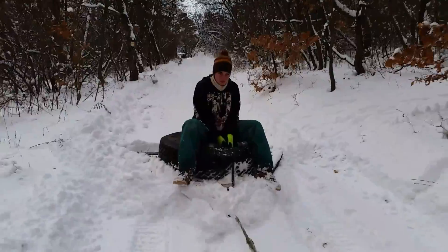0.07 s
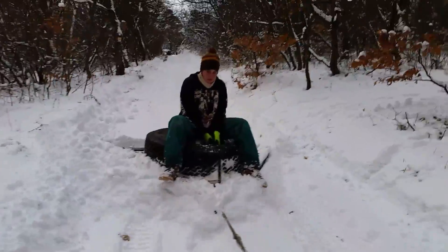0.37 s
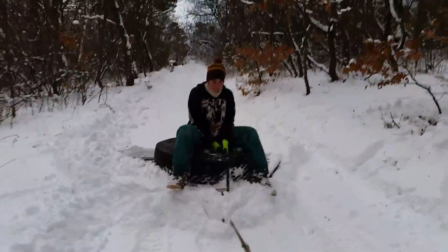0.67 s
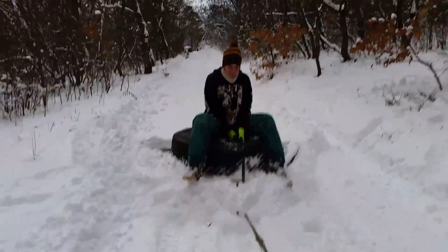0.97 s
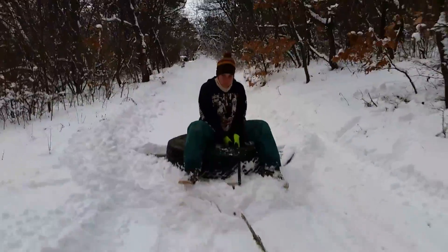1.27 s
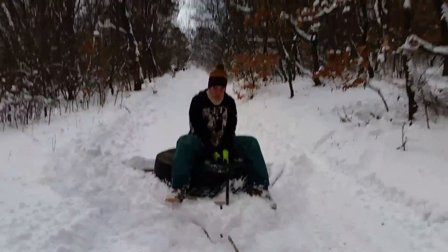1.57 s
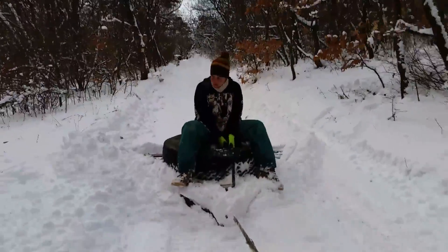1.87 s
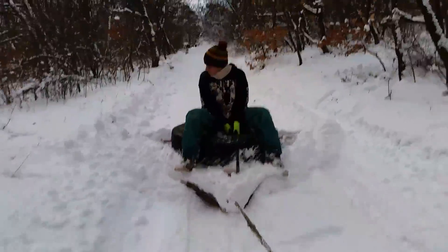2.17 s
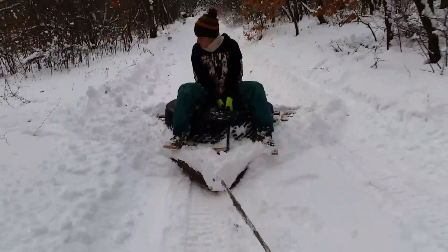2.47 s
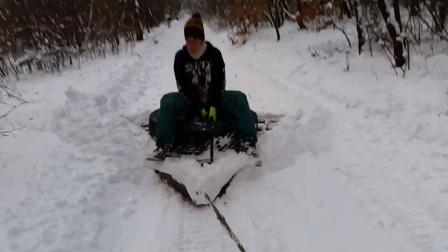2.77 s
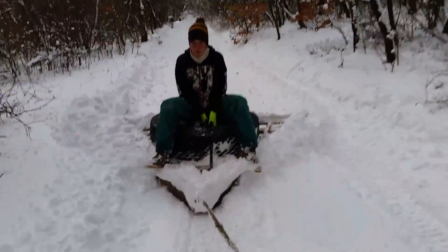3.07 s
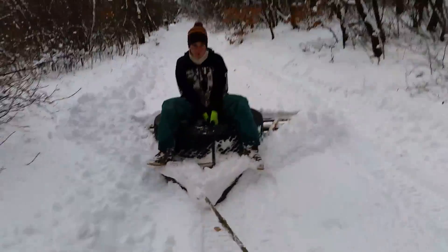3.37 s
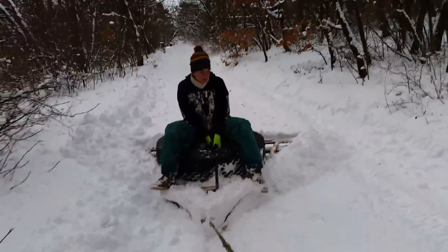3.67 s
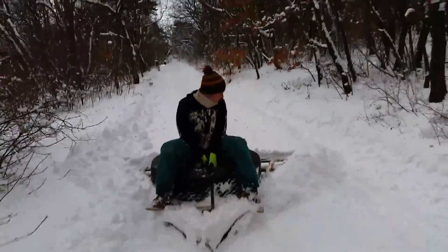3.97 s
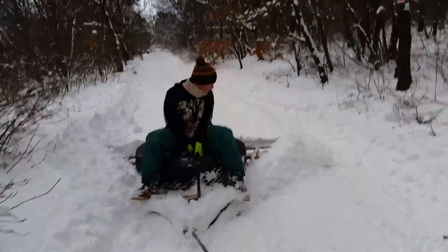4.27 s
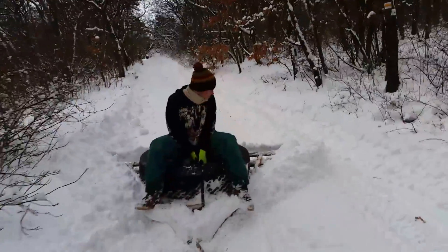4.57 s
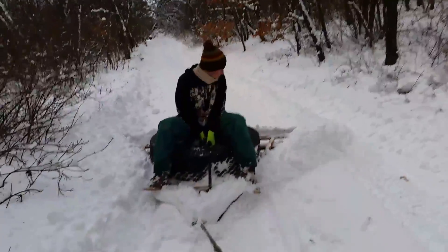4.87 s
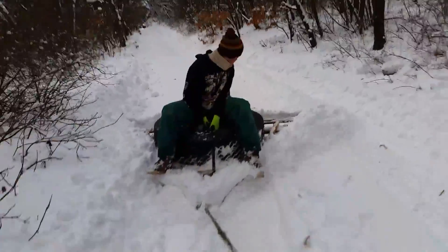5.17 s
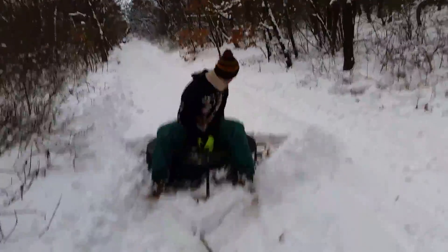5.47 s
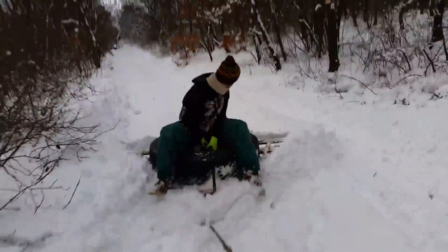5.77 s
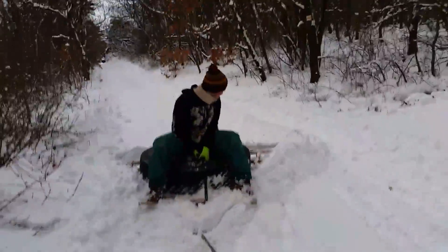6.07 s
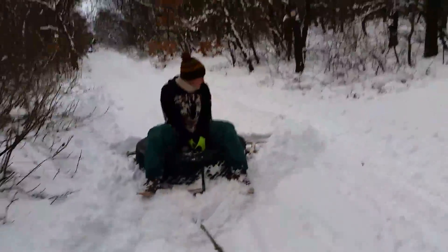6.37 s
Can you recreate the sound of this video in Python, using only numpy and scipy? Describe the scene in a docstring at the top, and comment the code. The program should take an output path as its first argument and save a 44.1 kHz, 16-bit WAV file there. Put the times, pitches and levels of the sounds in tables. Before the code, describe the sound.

A deep, booming four-cylinder exhaust dominates throughout about six and a half seconds, heard from the open back of a vehicle towing a small snow plough along a forest track. Soft engine knocking, valve clatter and low tyre rumble blend with it. The revs hold fairly steady until about 2.8 seconds, then sink in steps, wavering and labouring from 5 seconds on. The exhaust gulps very briefly at about 1.5, 2.8, 5, 5.3, 6 and 6.5 seconds.

More quietly, snow crunches and hisses continuously under the plough, growing a little stronger, with lumps crushed near 1.5 seconds, repeatedly between 3.5 and 5.3, and again towards the end. At about 5.8 seconds the towed frame gives one very short, ringing scrape. Tiny, sharp ticks occur irregularly close to the microphones, two or three a second. The left side carries most of the treble; the right sounds duller.

```python
"""The booming exhaust of a four-cylinder vehicle, heard by two microphones in its open back as it tows a
small snow plough with a rider along a forest track. Now and then the exhaust gulps as the revs sink.
The engine's casing knocks, its valves clatter and the tyres rumble. Snow crunches and hisses under the
plough, the towed frame scrapes once, and something small ticks close by.
The left microphone gets most of the treble."""
import sys
import numpy as np
from scipy import signal
from scipy.fft import rfft, irfft, next_fast_len
from scipy.io import wavfile
from scipy.ndimage import uniform_filter1d, minimum_filter1d

SR = 44100
rng = np.random.default_rng(int(sys.argv[2]) if len(sys.argv) > 2 else 0)


def log_audio(samples):
    """Write samples as a 16-bit WAV file to the path given in sys.argv[1]."""
    # one column per channel
    frames = np.atleast_2d(samples).T
    # limit to full scale, then quantise
    limited = np.clip(frames, -1, 1)
    pcm = np.round(limited * 32767).astype(np.int16)
    wavfile.write(sys.argv[1], SR, pcm)


N = 287973
TIME = np.arange(N) / SR

# spectrum of snow lumps and crusts breaking: (frequency [Hz], relative level [dB])
BREAKING_SNOW = [(500, -19.5), (1000, -12), (1600, -0.5), (2400, -1), (4000, -2), (6200, -23), (10000, -11),
                 (15000, -27.5)]


def exhaust(firings, hz, waver_db=.5, boom_lag_s=.0009):
    """Three strong harmonics of the firing rate, each as loud as the pipe makes it at that pitch."""
    # response of the exhaust pipe: (frequency [Hz], level [dB])
    pipe = [(53, -17), (60, -16.5), (63.5, -11), (69, -13), (110, -12.5), (121, -15), (135, -15.5),
            (165, -16.5), (188, -14), (205, -14.5)]
    # a standing wave in the open back pans the firing tone: (firing rate [Hz], left minus right [dB])
    standing_wave = [(59.5, 6), (63, -2.5), (68, -4)]
    angle = 2 * np.pi * firings
    first = undb(at(pipe, hz) + waver_db * walk(42)) * np.cos(angle)
    # the pipe's resonance holds the second harmonic back by a share of its cycle
    second = undb(at(pipe, 2 * hz) + waver_db * walk(25)) * np.cos(2 * angle - 2 * np.pi * .13)
    third = undb(at(pipe, 3 * hz) + waver_db * walk(25)) * np.cos(3 * angle)
    pan_db = at(standing_wave, hz)
    boom = two_mics(first, boom_lag_s) * undb(np.array([pan_db, -pan_db]) / 2)
    return np.sqrt(2) * (boom + two_mics(second + third, lag_s=.00068))


def gulping(boom, hz, level_db=-5, pitch_ratio=1.17, fall_hz_per_s=350):
    """In each gulp the boom gives way to one low tone that falls from just above the firing rate."""
    # gulps of the exhaust note: (time [s], half length [s])
    gulps = [(1.479, 0.012), (2.824, 0.023), (4.977, 0.012), (5.293, 0.023), (6.03, 0.013), (6.46, 0.01)]
    for s, half in gulps:
        dt = TIME - s
        pitch = pitch_ratio * np.interp(s, TIME, hz)
        cycles = pitch * dt - fall_hz_per_s * dt ** 2 / 2
        tone = np.sqrt(2) * undb(level_db) * np.cos(2 * np.pi * cycles)
        share = bump(s, half)
        boom = boom * (1 - share) + two_mics(tone * share, lag_s=.0015)
    return boom


def drone(firings, hz, gain_db=2.0):
    """Weaker, wavering engine tones swell as they cross the resonance of a body panel."""
    # quarter steps mostly come from unequal cylinders, 11.75 and 12.75 from the casing knocks that alternate in
    # sign, the others from belt-driven parts: (frequency [multiple of the firing rate], relative level [dB])
    orders = [(0.5, -46), (0.75, -42), (1.25, -31), (1.5, -30), (1.75, -39), (2.25, -33), (2.31, -29),
              (2.5, -33), (2.75, -38), (3.5, -31), (4.0, -38), (4.5, -40), (4.655, -35.5), (5.0, -42),
              (5.5, -42), (6.0, -42), (6.5, -40), (7.0, -47), (7.5, -47), (8.085, -44), (10.75, -48),
              (11.75, -45), (12.75, -48)]
    # body panel resonances: (frequency [Hz], half width [Hz], lift [dB])
    panels = [(248, 12, 5.5), (315.2, 6.7, 9), (447, 18, 8), (514, 6.7, 8)]
    tones = 0
    for multiple, db in orders:
        lift_db = sum(lift / (1 + ((multiple * hz - centre) / width) ** 2)
                      for centre, width, lift in panels)
        level = undb(db + lift_db + 1.2 * walk(12))
        cycles = multiple * firings + rng.random() + .03 * walk(9)
        tones = tones + level * np.cos(2 * np.pi * cycles)
    return two_mics(tones * np.sqrt(2) * undb(gain_db), lag_s=.00047)


def knock(firings, hz, knock_db=-36.3, weak_db=-2.5, scatter_db=1.9, rattle_db=-36.0, loose_db=-1.5):
    """One soft knock per crank turn rings the casing; a half-regular rattle keeps it ringing."""
    turns = np.arange(int(firings[-1] / 2))
    jitter, scatter = rng.standard_normal((len(turns), 2)).T
    times = np.interp(2 * turns + .58, firings, TIME) + .0001 * jitter
    # every second knock is weaker and pushes the casing the other way
    force = np.where(turns % 2, -undb(weak_db), 1) * undb(scatter_db * scatter)
    blows = np.bincount(np.clip(times * SR, 0, N - 1).astype(int), force, N)
    soft_blows = low_pass(blows, hz=1700, order=4)  # oily contacts and the bonnet take the edge off
    regular = np.array([cycle_noise(firings), cycle_noise(firings)])
    rattle = low_pass(regular + undb(loose_db) * noise_pair(.033), hz=2600, order=4)
    # 1 dB louder as the engine labours at low revs
    knocks = unit(casing(soft_blows)) * undb(knock_db - revs(hz))
    return two_mics(knocks, lag_s=.00022) + unit(casing(rattle)) * undb(rattle_db + walk(11))


def casing(force):
    """The engine's casing rings in modes of alternating sign."""
    # casing modes: (frequency [Hz], width [Hz], gain [dB])
    modes = [(430, 80, 0), (506, 20, -9), (606.5, 140, 3), (775, 60, 10), (877, 21, 12.5), (1111, 42, -8),
             (1382, 54, 0), (1702, 36, -1.5), (2050, 88, -7)]
    return sum((-1) ** k * undb(db) * resonate(force, hz, width)
               for k, (hz, width, db) in enumerate(modes))


def clatter(firings, hz, level_db=-31.5, throb_depth=.1):
    """Valve and gas noise throbs with the firings and partly repeats with every cycle of four."""
    # valve and gas noise: (frequency [Hz], relative level [dB])
    spectrum = [(200, -1.5), (300, -5), (480, -2.5), (600, -8), (880, -5), (1150, -10), (1650, -15),
                (2080, -18), (2400, -25), (3100, -27.5), (4400, -35), (5800, -50)]
    throb = 1 + throb_depth * np.cos(2 * np.pi * (firings - .7))
    noise = two_mics(cycle_noise(firings), lag_s=.0002) + .6 * noise_pair(.1)
    return unit(colour(noise * throb, spectrum)) * undb(level_db + revs(hz) + walk(12))


def tyres(level_db=-22):
    """The rolling wheels and the body rumble, nearly alike at both microphones."""
    # rolling noise: (frequency [Hz], relative level [dB])
    spectrum = [(12, -31.5), (30, -25), (55, 2.5), (90, -9.5), (160, -2), (250, -6.5), (350, -6.5),
                (500, -19.5), (800, -18), (1600, -61.5)]
    return unit(colour(noise_pair(.9), spectrum)) * undb(level_db + .57 * walk(9))


def snow(crunch_db=-45, hiss_db=-50.5):
    """Behind the vehicle the plough breaks packed snow into dense grains, hisses and crushes lumps."""
    # how hard the plough bites: (time [s], relative level [dB])
    bite = [(0.1, -5), (0.9, -0.5), (3.3, 1.5), (3.6, 2), (4.3, 1), (5.25, 2.5), (5.55, -1), (5.85, 1),
            (6.5, 3.5)]
    # breaking grains: (frequency [Hz], relative level [dB])
    crunch_spectrum = [(600, -16.5), (1500, 7), (2400, 1), (3100, 3), (4400, -7.5), (5400, -13.5),
                       (7000, -37.5), (10000, -15), (15000, -21.5)]
    # fine hiss above them: (frequency [Hz], relative level [dB])
    hiss_spectrum = [(3530, -27), (6000, -12), (7570, -14), (9110, 2), (9790, 4), (13400, -10),
                     (15200, -7.5), (15600, -3)]
    # lumps being crushed: (time [s], half length [s], level [dB])
    lumps = [(1.545, 0.018, -47), (3.526, 0.06, -45), (3.802, 0.016, -40), (4.581, 0.025, -37.5),
             (4.693, 0.035, -43.5), (4.928, 0.017, -42.5), (5.08, .04, -43), (5.26, 0.055, -43.5),
             (5.82, 0.015, -40), (6.487, 0.035, -39)]
    bite_db = at(bite, TIME)
    grains = undb(1.5 * walk(900) + walk(50) + walk(14))
    crunch = unit(colour(noise_pair(.13) * grains, crunch_spectrum)) * undb(crunch_db + bite_db)
    hiss = unit(colour(noise_pair(.05), hiss_spectrum)) * undb(hiss_db + .3 * bite_db + .7 * walk(30))
    swells = sum(undb(db) * bump(s, half) for s, half, db in lumps)
    crush = unit(colour(noise_pair(.18) * grains, BREAKING_SNOW)) * swells
    return crunch + hiss + crush + crackle(bite_db)


def crackle(bite_db, per_s=70, spread_db=1.5, level_db=-56.0):
    """Single crusts of snow snap at random, a few louder than the rest."""
    when, rarity = rng.random((int(per_s * N / SR), 2)).T
    sizes = undb(-spread_db * np.log(np.maximum(rarity, .05)))
    snaps = np.bincount((when * N).astype(int), sizes, N)
    return two_mics(unit(colour(snaps, BREAKING_SNOW)), lag_s=.00043) * undb(level_db + bite_db)


def scrape(time_s=5.818, half_s=.016):
    """The towed frame gives one short scrape that rings its resonances."""
    # frame resonances: (frequency [Hz], width [Hz], level [dB])
    modes = [(1020, 300, -31.5), (1560, 240, -30.5), (2250, 400, -47)]
    ring = 0
    for hz, width, db in modes:
        band = resonate(noise_pair(.2), hz, width)
        ring = ring + unit(resonate(band, hz, 4 * width)) * undb(db)
    return ring * bump(time_s, half_s)


def ticks(ring_hz=4500, body_hz=3500, body_db=-2.5, attack_s=.00033, decay_s=.00063, size=600):
    """Tiny hard contacts close to the microphones, each ringing at two pitches for a few cycles."""
    # contacts: (time [s], relative peak level [dB])
    contacts = [(0.4844, -37.5), (0.8234, -38), (1.1248, -48), (1.653, -40), (2.0736, -35), (2.2942, -49),
                (2.4882, -37), (2.6489, -34.5), (2.7482, -36), (2.9644, -37), (3.371, -42), (3.7464, -40),
                (4.1206, -41), (5.0559, -36), (5.4804, -33.5), (5.8287, -33.5), (6.1192, -32)]
    out, t = np.zeros(N + size), np.arange(size) / SR
    envelope = (1 - np.exp(-t / attack_s)) * np.exp(-t / decay_s)
    body = undb(body_db) * np.sin(2 * np.pi * body_hz * t)
    for s, db in contacts:
        hz = ring_hz * (1 + .03 * rng.standard_normal())
        ring = envelope * (np.sin(2 * np.pi * hz * t) - body)
        start = int(s * SR)
        out[start:start + size] += undb(db) * ring / np.abs(ring).max()
    return low_pass(out[:N], hz=5300, order=6) * undb([[3.0], [13.0]])  # left, right


def revs(hz):
    """How fast the engine runs: 0 at low revs, 1 at high."""
    return np.interp(hz, [60, 66], [0, 1])


def cycle_noise(firings, size=2600):
    """Noise that repeats with every cycle of four firings."""
    return unit(np.interp(firings / 4 % 1 * size, np.arange(size), rng.standard_normal(size)))


def two_mics(x, lag_s):
    """The sound reaches the right microphone a little after the left."""
    return np.array([x, np.interp(TIME - lag_s, TIME, x)])


def noise_pair(share):
    """White noise at two microphones; a share of its power is common, 13 samples later on the right."""
    common = rng.standard_normal(N)
    separate = rng.standard_normal((2, N))
    return np.sqrt(share) * np.array([common, np.roll(common, 13)]) + np.sqrt(1 - share) * separate


def walk(rate):
    """Random levels held 1 / rate s and smoothed twice; spread near 1."""
    hold = int(SR / rate)
    steps = np.repeat(rng.standard_normal(N // hold + 1), hold)
    return 1.3 * uniform_filter1d(uniform_filter1d(steps, hold), hold)[:N]


def bump(s, half):
    """A smooth swell of height 1 around time s."""
    return np.exp(-((TIME - s) / half) ** 2)


def colour(x, points):
    """Filter by a spectrum of (frequency [Hz], gain [dB]) points."""
    hz, db = np.transpose(points)
    size = next_fast_len(N + 4096)
    bins_hz = np.maximum(np.fft.rfftfreq(size, 1 / SR), 1)
    gain = undb(np.interp(np.log(bins_hz), np.log(hz), db))
    return irfft(rfft(x, size) * gain, size)[..., :N]


def resonate(x, hz, width_hz):
    """One resonance, gain 1 at its centre."""
    return signal.lfilter(*signal.iirpeak(hz, hz / width_hz, fs=SR), x)


def low_pass(x, hz, order):
    """Dull the sound above hz."""
    return signal.sosfilt(signal.butter(order, hz, fs=SR, output="sos"), x)


def at(points, x):
    """Read a two-column table at a moving frequency or time."""
    return np.interp(x, *np.transpose(points))


def undb(db):
    """Decibels to gain."""
    return 10 ** (np.asarray(db) / 20)


def unit(x):
    """Scale to rms 1."""
    return x / np.sqrt(np.mean(x ** 2))


def scene():
    """The firing count drives all engine sounds; the right microphone is shaded."""
    # engine speed: (time [s], firing rate [Hz])
    speed = [(0, 64.8), (0.4, 67.6), (0.72, 66.3), (1.22, 69.6), (1.65, 66.3), (2.15, 67.0), (2.72, 68.2),
             (2.9, 63.4), (3.45, 63.5), (3.85, 60.3), (4.65, 60.1), (5.05, 56.0), (5.22, 58.2),
             (5.42, 54.2), (5.95, 56.1), (6.08, 51.8), (6.33, 56.3), (6.53, 53.3)]
    # shading of the right microphone: (frequency [Hz], gain [dB])
    right_shade = [(60, -3.5), (130, -1), (200, -2.5), (300, -8.5), (470, -0.5), (700, -11.5), (1200, -9.5),
                   (2400, -19), (4400, -10), (9000, -23), (13500, -14), (15500, -2)]
    hz = at(speed, TIME)
    firings = np.cumsum(hz) / SR
    boom = exhaust(firings, hz) + drone(firings, hz)
    engine = gulping(boom, hz) + knock(firings, hz) + clatter(firings, hz)
    left, right = engine + tyres() + snow() + scrape() + ticks()
    return np.array([left, colour(right, right_shade)])


def record(dry, ceiling=.93, window=600, top_hz=15750):
    """A limiter holds the highest peaks down; the recorder cuts the top of the treble."""
    allowed = np.minimum(1, ceiling / (np.abs(dry).max(axis=0) + 1e-9))
    gain = uniform_filter1d(minimum_filter1d(allowed, window), window)
    return signal.sosfilt(signal.ellip(10, .1, 80, top_hz, fs=SR, output="sos"), dry * gain)


dry = scene()
out = record(dry)
log_audio(out)
```